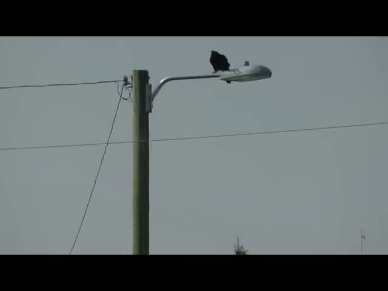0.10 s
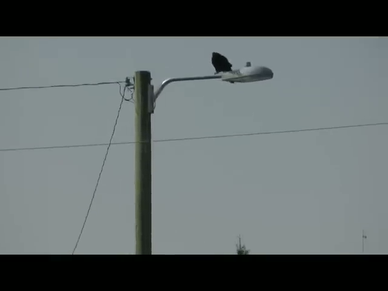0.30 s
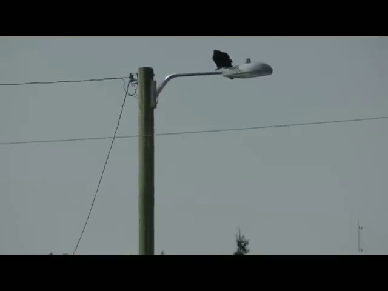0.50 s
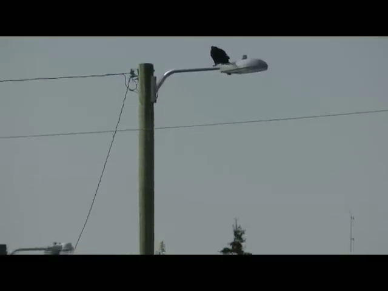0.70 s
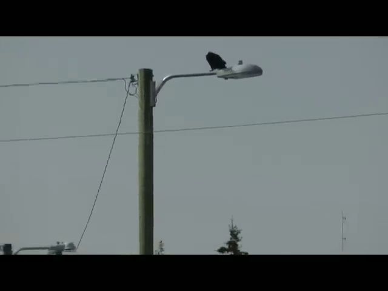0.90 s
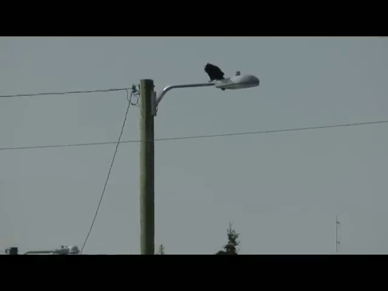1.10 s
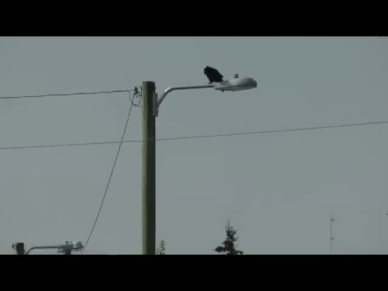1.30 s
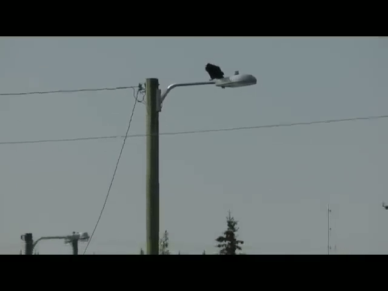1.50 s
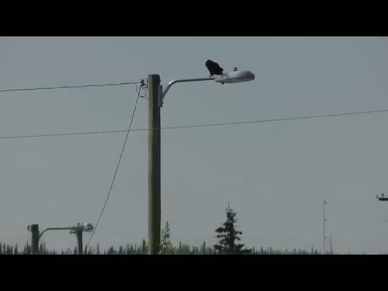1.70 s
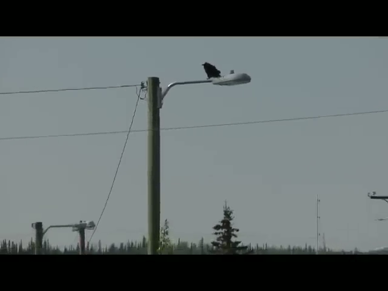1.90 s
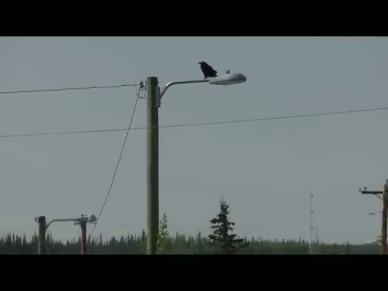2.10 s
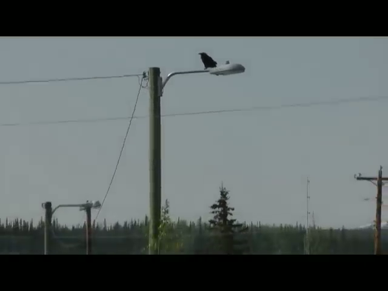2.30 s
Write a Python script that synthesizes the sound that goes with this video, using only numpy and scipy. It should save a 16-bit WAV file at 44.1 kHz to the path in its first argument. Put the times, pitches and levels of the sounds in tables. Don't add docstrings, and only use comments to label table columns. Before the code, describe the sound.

Raven calls: three quick pairs of clear throaty notes and one rattling croak, echoing off trees

```python
import sys
import numpy as np
from scipy import signal
from scipy.fft import rfft, irfft
from scipy.io import wavfile
from scipy.ndimage import uniform_filter1d

SR = 44100
rng = np.random.default_rng(int(sys.argv[2]) if len(sys.argv) > 2 else 0)


def generate_wav(signal):
    frames = np.transpose(np.atleast_2d(signal))
    scaled = np.clip(frames, -1, 1) * 32767
    pcm = np.round(scaled).astype(np.int16)
    wavfile.write(sys.argv[1], SR, pcm)


def to_linear_factor(level_db):
    exponent = np.asarray(level_db, float) / 20
    return 10 ** exponent


N = 101430
LEAD = SR // 2


def at_hz(points, hz, axis=1):
    points = np.array(points)
    return np.interp(np.log(hz), np.log(points[:, 0]), points[:, axis])


def drift(rate_hz, size):
    r = np.exp(-2 * np.pi * rate_hz / SR)
    slow = signal.lfilter([1], [1, -2 * r, r * r], rng.standard_normal(size + SR))[SR:]
    return slow / slow.std()


def band_pass(order, low_hz, high_hz, x):
    sos = signal.butter(order, [low_hz, high_hz], "band", fs=SR, output="sos")
    return signal.sosfilt(sos, x)


def puff_shape(t, centre_s, length_s):
    return np.exp(-((t - centre_s) / length_s) ** 2)


def tilt(x, balance):
    hz = np.arange(1, x.shape[1] // 2 + 2) * SR / x.shape[1]
    half = to_linear_factor(at_hz(balance, hz) / 2) * np.exp(.5j * at_hz(balance, hz, axis=2))
    return irfft(rfft(x) * [half, 1 / half], x.shape[1])


# pitch_hz, density_db_per_hz
AIR_COLOUR = [(40, -6), (130, -1), (400, -1.5), (1100, -12.5), (2000, -8.5), (4000, -13.5), (8000, -18.5),
              (15000, -18.5)]
# pitch_hz, left_minus_right_db
AIR_BALANCE = [(60, 0.0), (200, 1.5), (380, -2), (700, -5), (1290, -8), (4400, -7), (8120, -8.5),
               (15000, -17)]
# pitch_hz, likeness (-1 to 1)
AIR_ALIKE = [(60, .5), (130, .3), (290, -.45), (640, -.4), (1410, .2), (3100, .2), (6820, .25), (15000, .4)]


def air():
    hz = np.arange(1, N // 2 + 2) * SR / N
    a, b = rfft(rng.standard_normal((2, N)))
    alike = np.clip(at_hz(AIR_ALIKE, hz), -1, 1)
    right_db = at_hz(AIR_COLOUR, hz)
    right = a * to_linear_factor(right_db)
    left = (alike * a + np.sqrt(1 - alike ** 2) * b) * to_linear_factor(right_db + at_hz(AIR_BALANCE, hz))
    x = irfft(np.array([left, right]), N)
    return to_linear_factor(-56) * x / x[1].std()


# pitch_hz, level_db, left_minus_right_db, left_polarity
HUM_TONES = [
    (118, -77.5, 5.5, 0.66),
    (427.3, -65, -3, -0.94),
    (854.6, -59.5, -7.5, -1.01),
]


def hum():
    t, out = np.arange(N) / SR, 0
    for hz, level_db, pan_db, polarity in HUM_TONES:
        level = to_linear_factor(level_db + drift(5.1, N))
        tone = level * np.sin(2 * np.pi * hz * t + 0.25 * drift(4.16, N))
        out = out + tone * [[polarity * to_linear_factor(pan_db)], [1]]
    return out


# time_s, pitch_hz, level_db
EARLIER = [
    [(-.45, 705, -25), (-.42, 720, -35.5), (-.38, 730.6, -31.5), (-.35, 715, -57)],
    [(-.3, 714.6, -64), (-.28, 745, -33.5), (-.25, 741, -31.5), (-.22, 725, -68)],
]


def earlier_call():
    return notes(EARLIER, VOICE_A)


# pitch_hz, t60_s, level_db
ECHO_BANDS = [(406, 1.1, -11), (740, 2.3, 0), (1050, 2.67, 2), (1370, 2.69, -3.5), (2150, 1.16, 6.5),
              (3000, 1.09, 9), (6000, 0.3, -4)]
# pitch_hz, left_minus_right_db, left_leads_rad
ECHO_BALANCE = [(400, -6, 0), (1000, -7, 0), (1500, -10, -.3), (1700, -7, 0), (4000, -8, 0)]


def echo(x):
    far_db, far_delay_s, near_db, near_t60_s, alike = -16.5, 0.044, -32, 0.26, 0.65
    t, tail = np.arange(2 * SR) / SR, 0
    white = rng.standard_normal((2, 2, len(t)))
    edges_hz = 300 * 2 ** np.arange(0, 5.6, .5)
    for k, (low, high) in enumerate(zip(edges_hz, edges_hz[1:])):
        a, b = band_pass(2, low, high, white[k % 2])
        centre_hz = np.sqrt(low * high)
        far = to_linear_factor(far_db - 60 * t / at_hz(ECHO_BANDS, centre_hz)) * np.clip(t / far_delay_s, 0, 1)
        near = to_linear_factor(near_db - 60 * t / near_t60_s) * (t > .006)
        pair = np.array([alike * a + np.sqrt(1 - alike ** 2) * b, a])
        tail = tail + to_linear_factor(at_hz(ECHO_BANDS, centre_hz, axis=2)) * (far + near) * pair
    wet = signal.fftconvolve(x[None], tail / np.sqrt(SR / 10), axes=1)
    return tilt(wet[:, LEAD:N + LEAD], ECHO_BALANCE)


# centre_s, length_s
RUSTLE_TIMES = [(.18, .02), (.279, .005), (.299, .002), (.3105, .0012), (.3335, .003), (.02, .03),
                (1.89, .008), (.3105, .001), (.185, .015)]
# pitch_hz, level_db
RUSTLE_BANDS = [
    (4500, -58),
    (3600, -48),
    (5000, -54),
    (8000, -50),
    (2000, -42),
    (3200, -59),
    (1150, -50),
    (4500, -52),
    (10500, -59),
]


def rustles():
    t, out = np.arange(N) / SR, 0
    for (centre_s, length_s), (hz, level_db) in zip(RUSTLE_TIMES, RUSTLE_BANDS):
        noise = band_pass(2, hz / 1.4, hz * 1.4, rng.standard_normal(N))
        out = out + to_linear_factor(level_db) * puff_shape(t, centre_s, length_s) * noise
    return out * to_linear_factor(np.array([[-4], [3]]))


# pitch_hz, half_width_hz, lift_db
THROAT = [(3370, 170, 13), (6250, 300, 12)]


def throat(hz):
    return sum(db / (1 + ((hz - centre_hz) / width_hz) ** 2) for centre_hz, width_hz, db in THROAT)


def span(rows):
    s, hz, db = np.transpose(rows)
    i = np.arange(int(s[0] * SR), int(s[-1] * SR))

    def smooth(column):
        return uniform_filter1d(np.interp(i / SR, s, column), size=90, mode="nearest")

    edge = np.minimum(1, np.minimum(i - i[0], i[-1] - i) / (.004 * SR))
    return i + LEAD, i / SR, smooth(hz), smooth(db) + 4.0, edge


def notes(pair, voices, beak_closes_db_per_s=0):
    out = np.zeros(N + LEAD)
    for rows, voice in zip(pair, voices):
        i, t, hz, db, edge = span(rows)
        turn = 2 * np.pi * np.cumsum(hz * (1 + .004 * drift(110, len(i)))) / SR
        peak = db.argmax()
        breath = band_pass(1, 1200, 7450, rng.standard_normal(len(i)))
        out[i] += edge * to_linear_factor(db - 44.5) * breath
        closing_s = np.maximum(t - t[peak] + .01, 0)
        for partial, level_db in enumerate(voice, 1):
            follows = {1: .55, 2: 1}.get(partial, 1.3)
            waver_db = 1.1 * np.sqrt(max(partial - 2, 0)) * drift(40, len(i))
            if partial > 4:
                waver_db = waver_db - beak_closes_db_per_s * closing_s
            waver_db = waver_db + throat(partial * hz) - throat(partial * hz[peak])
            level = to_linear_factor(db[peak] + level_db + follows * (db - db[peak]) + waver_db)
            out[i] += edge * level * np.sin(partial * turn)
    return out


# time_s, pitch_hz, second_partial_level_db
PAIR_A = [
    [(.203, 579, -60.5), (.213, 649, -50), (.221, 705, -31), (.229, 709, -31.5), (.239, 710.4, -26.5),
     (.253, 729.7, -25.5), (.264, 739.6, -25.5), (.277, 723, -37), (.289, 690, -40)],
    [(.311, 715, -46), (.318, 715.4, -32), (.324, 720, -42.5), (.330, 729, -38), (.334, 766, -33),
     (.344, 747, -30.5), (.358, 746, -29.5), (.369, 713, -40.5), (.382, 697, -55)],
]
VOICE_A = [
    [-18.5, 1, -19, -27, -42, -50.5, -45, -40, -39],
    [-15.5, -0.5, -18, -20.5, -35.5, -50, -41, -35.5, -42, -40],
]
# time_s, pitch_hz, level_db
CRACK = [
    [(.27, 750, -62), (.277, 700, -54), (.285, 690, -56), (.3, 720, -60)],
]
CRACK_VOICE = [
    [-30, -20, -6, 0, -12, -11],
]


def first_pair():
    return notes(PAIR_A, VOICE_A, 650) + notes(CRACK, CRACK_VOICE)


# time_s, pitch_hz, second_partial_level_db
PAIR_B = [
    [(.705, 796, -61), (.714, 852, -51.5), (.722, 802, -39), (.73, 818, -32), (.742, 827, -31),
     (.758, 780, -33), (.768, 766, -38.5), (.779, 749, -35.5), (.79, 755, -72)],
    [(.82, 802, -53), (.826, 809, -50), (.832, 773.4, -32.5), (.839, 749.6, -45), (.845, 767, -37.5),
     (.851, 829.6, -29), (.868, 833.6, -29.5), (.874, 807, -36.5), (.883, 713, -61)],
]
VOICE_B = [
    [-10.5, -2, -15, -9, -24.5, -28, -35.5, -47],
    [-14.5, 1.5, -17, -18.5, -27.5, -32.5],
]


def second_pair():
    return notes(PAIR_B, VOICE_B, 60)


# time_s, second_partial_pitch_hz, level_db
CROAK = [(1.313, 1054, -72), (1.322, 1050, -41), (1.338, 1027, -41), (1.36, 1056, -35.5),
         (1.385, 1041, -36.5), (1.406, 1007, -33.5), (1.42, 999, -39), (1.432, 996, -42), (1.45, 945, -59)]
# multiple_of_fundamental, level_db
CROAK_VOICE = [(1, -20), (2, 0.0), (3, -15), (4.15, -16), (5.03, -11), (6.15, -4), (6.7, -22), (7.65, -22),
               (9.05, -10), (10.7, -13), (11.2, -13), (12.1, -22), (14, -28), (16, -30), (18, -27)]
# time_s, strength_db, rest_until_next_db, low_voice_dip (0-1)
SLAPS = [(1.3203, 0, -20, .25), (1.3318, 3, -22, .35), (1.3455, 2, -17, .5), (1.3575, -2, -15, .35),
         (1.3703, -2, -9, .5), (1.3843, -3, -11, .55), (1.3975, -8, -11, .75), (1.4118, -10, -7, .85),
         (1.4255, -13, -5, .8), (1.438, -20, -4, .5), (1.451, -24, -4, .3)]


def croak():
    out = np.zeros(N + LEAD)
    i, t, hz, db, edge = span(CROAK)
    slap_s, slap_db, rest_db, depth = np.transpose(SLAPS)
    n = np.arange(len(slap_s))
    nth = np.interp(t, slap_s, n).astype(int)
    since_s = np.where(t > slap_s[0], t - slap_s[nth], 1)
    burst = np.exp(-since_s / .0035) * np.minimum(since_s / .0008, 1)
    flare = uniform_filter1d((to_linear_factor(rest_db[nth]) + burst) * to_linear_factor(slap_db[nth]), size=20)
    count = np.interp(t - .002, slap_s, n)
    slap_cycle = 2 * np.pi * count
    dip = 1 - np.clip(np.interp(count, n, depth), 0, .95) * (.5 + .5 * np.cos(slap_cycle))
    turn = np.pi * np.cumsum(uniform_filter1d(hz, size=600, mode="nearest")) / SR
    chirped = turn - .16 * np.sin(slap_cycle)
    for multiple, level_db in CROAK_VOICE:
        if multiple < 2.5:
            rasp_rad, chop = .12, dip
        else:
            uneven = to_linear_factor(1.5 * rng.standard_normal(12))[nth]
            rasp_rad, chop = .11, (flare * uneven) ** (1.8 if multiple > 7 else 1)
        rasp = rasp_rad * multiple * drift(100, len(i))
        out[i] += edge * to_linear_factor(db + level_db) * chop * np.cos(multiple * chirped + rasp)
    return out


# time_s, pitch_hz, second_partial_level_db
PAIR_C = [
    [(1.69, 611.5, -67), (1.708, 653.5, -49), (1.722, 695, -38.5), (1.734, 682.8, -34),
     (1.748, 717.2, -32.5), (1.762, 705.3, -33.5), (1.772, 709, -40.5), (1.784, 648, -54)],
    [(1.831, 692, -67), (1.838, 740, -50), (1.85, 785, -44.5), (1.861, 754.5, -46), (1.868, 737, -44.5),
     (1.877, 727, -50)],
]
VOICE_C = [
    [-14, 0, -22.5, -31, -26, -26],
    [-4, 0.0044, -20.5, -25.5, -23, -24],
]


def last_pair():
    return notes(PAIR_C, VOICE_C, 550)


# centre_s, length_s, level_db
PUFFS = [
    (1.89, .04, -66),
    (2.09, .045, -53),
    (2.22, .04, -58),
]


def wind():
    t = np.arange(N) / SR
    low = band_pass(2, 25, 55, rng.standard_normal((2, N)))
    swell = sum(to_linear_factor(db) * puff_shape(t, centre_s, length_s) for centre_s, length_s, db in PUFFS)
    return swell * low / low.std()


# pitch_hz, left_minus_right_db, left_leads_rad
BIRD_BALANCE = [(520, -7, .5), (740, -10, .5), (830, -7, .7), (1040, -2, .3), (1450, -2, .55),
                (1660, 0, .1), (2400, -2.5, 0), (3100, -7, .15)]


def scene():
    facing = earlier_call() + first_pair() + second_pair() + croak()
    turned = last_pair()
    direct = tilt(np.array([(facing + turned)[LEAD:]] * 2), BIRD_BALANCE)
    returns = echo(facing + to_linear_factor(4.5) * turned)
    return air() + hum() + returns + rustles() + direct + wind()


def band_limit(x):
    return signal.sosfilt(signal.butter(12, 15710, fs=SR, output="sos"), x)


def record(dry):
    mix = signal.sosfilt(signal.cheby2(12, 60, 16200, fs=SR, output="sos"), dry)
    return band_limit(mix)


dry = scene()
out = record(dry)
generate_wav(out)
```